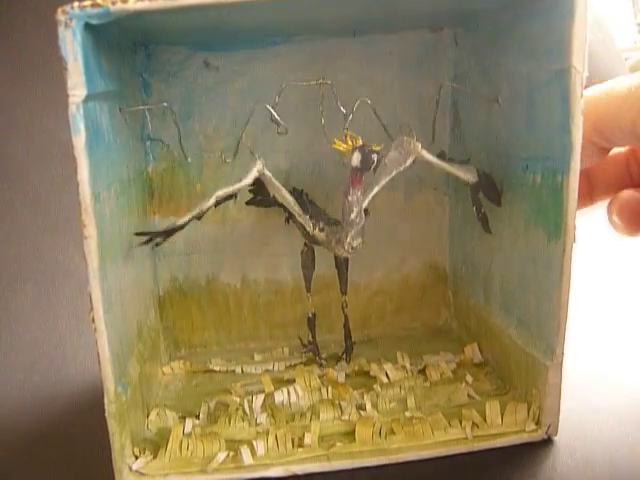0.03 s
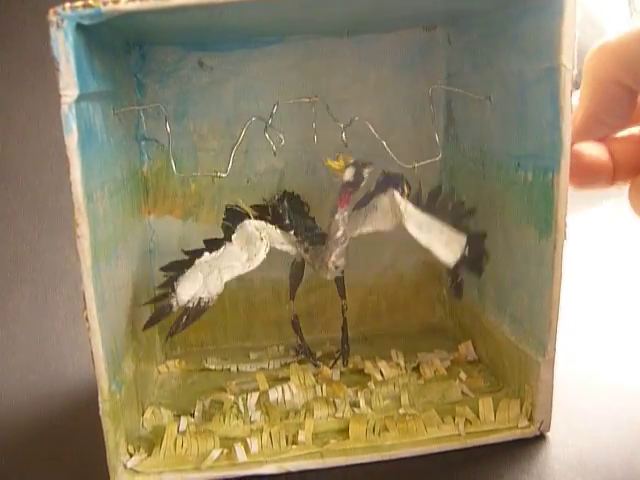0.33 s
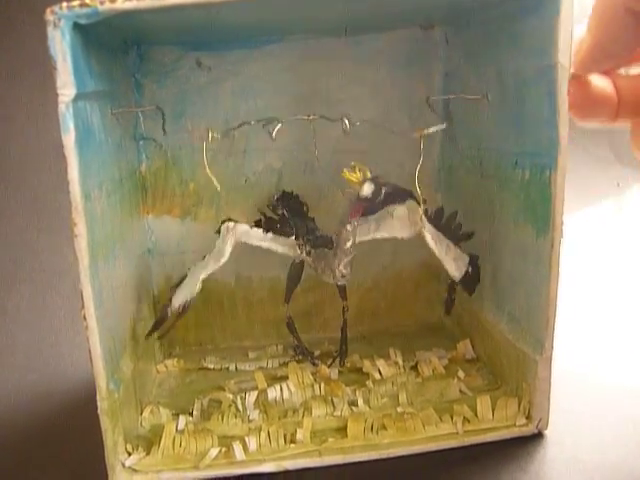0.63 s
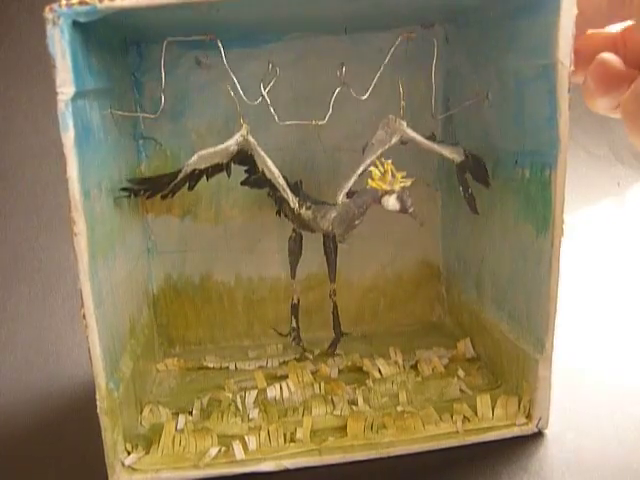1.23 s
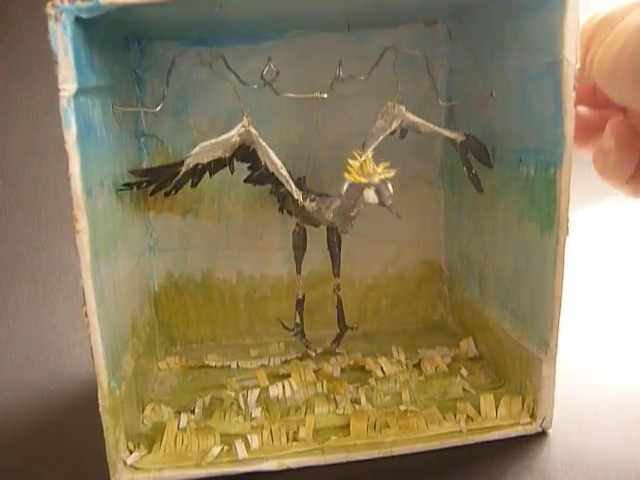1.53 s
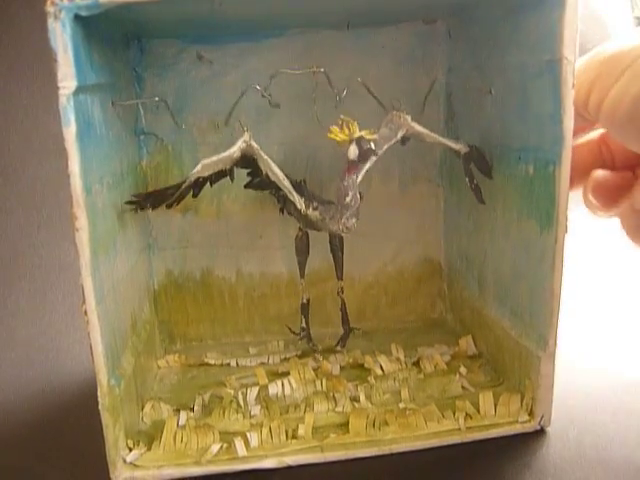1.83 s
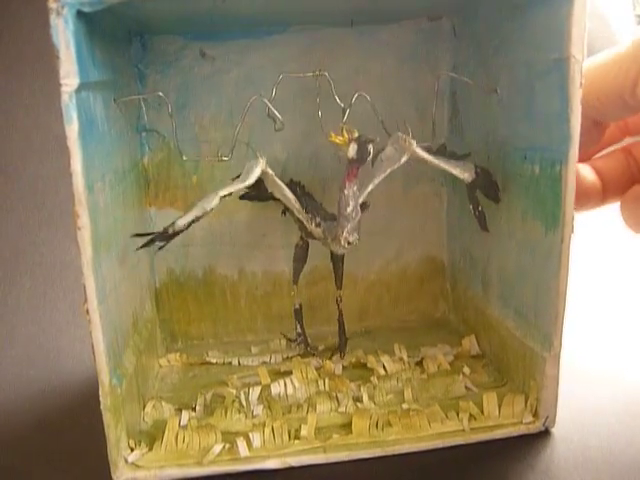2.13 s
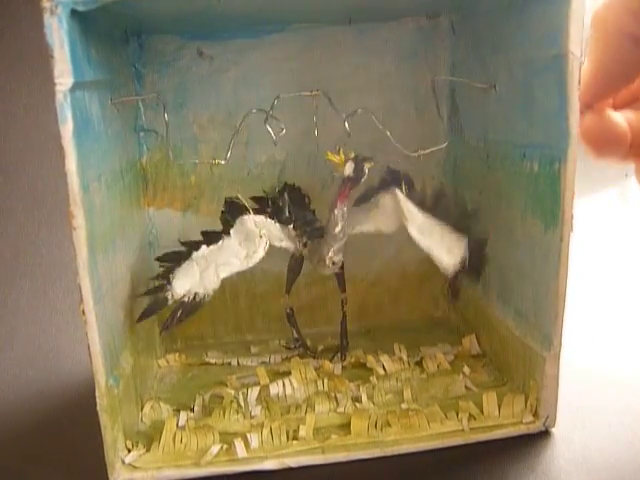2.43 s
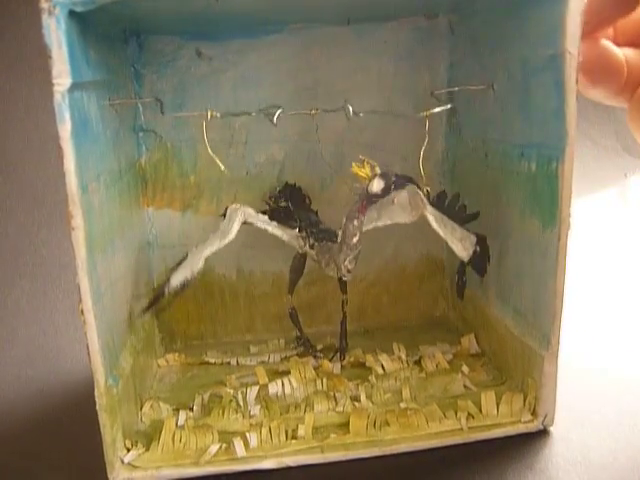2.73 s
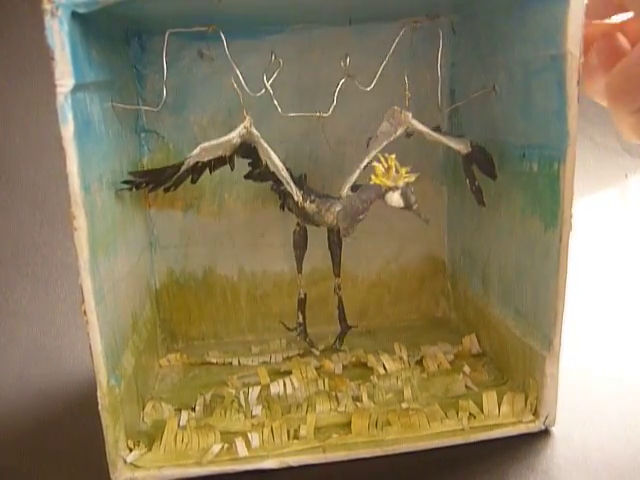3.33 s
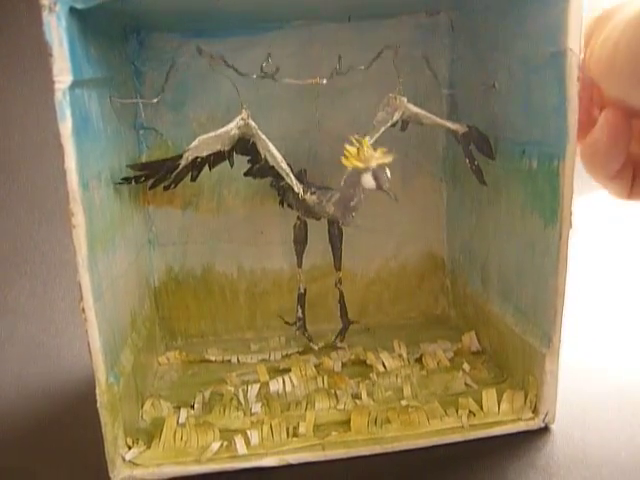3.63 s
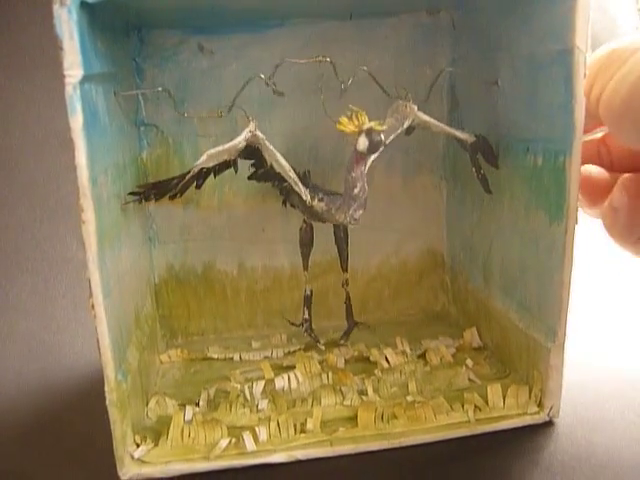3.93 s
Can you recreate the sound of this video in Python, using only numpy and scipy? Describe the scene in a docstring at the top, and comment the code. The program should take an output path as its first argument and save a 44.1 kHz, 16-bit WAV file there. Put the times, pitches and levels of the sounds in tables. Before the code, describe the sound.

A small wire and cardboard toy clicks, rubs and snaps as it is cranked by hand.

```python
"""A link snaps down over the wire crank of a hand-turned paper bird, once in each of two turns.
Each impact excites the damped modes of the toy's small cardboard box. In between, stick-slip friction
makes the wire rub, catch and knock in its cardboard bearings, and the wings rustle. The quiet room adds
a short reverberation and soft noise, with a faint electrical whine and faint dry electrical ticks."""
import sys
import numpy as np
from scipy import signal
from scipy.fft import rfft, irfft
from scipy.io import wavfile
from scipy.ndimage import uniform_filter1d

SR = 44100
rng = np.random.default_rng(int(sys.argv[2]) if len(sys.argv) > 2 else 0)


def output_pcm(signal):
    """Save a mono or channel-first signal as 16-bit PCM at the path in sys.argv[1].

    Samples are clipped to [-1, 1] before scaling.
    """
    pcm = np.clip(np.atleast_2d(signal).T, -1, 1) * 32767
    wavfile.write(sys.argv[1], SR, np.round(pcm).astype(np.int16))


N = 176400
T = np.arange(SR // 4) / SR  # time axis of one impact, t/s

# Levels in spectra and modes are relative.
# room noise spectrum: f/Hz, level/dB
AIR_SPECTRUM = [(20, -17), (45, -11.5), (90, -9), (150, -0.5), (200, 0.5), (245, 4), (300, 0), (400, 1),
                (520, -2.5), (700, -1.5), (870, -5), (1100, 0.5), (1400, -7.5), (1800, -11), (2700, -11.5),
                (3600, -15.5), (5000, -22), (6500, -23.5), (8000, -26.5)]
# electrical tones: f/Hz, level/dB
WHINE_TONES = [(1384, -62), (1631, -67.5), (5398, -76.5), (6222.5, -80), (6666.5, -77.5)]
# faint dry electrical ticks: t/s, relative level/dB
TICKS = [(.1375, -40), (.144, -41), (.277, -39), (.647, -40), (1.017, -44), (1.030, -38), (1.510, -40),
         (1.539, -38), (1.5585, -39), (1.7425, -39), (2.116, -39), (2.200, -41), (2.356, -38),
         (2.5465, -40), (2.8865, -40), (2.9155, -36.5), (3.120, -42), (3.142, -38), (3.535, -43)]
# tick spectrum: f/Hz, level/dB
TICK_SPECTRUM = [(300, -9), (2000, -4), (5000, -3), (8000, -1.5)]
# reverberation time: f/Hz, t60/s
ROOM_T60 = [(200, 0.3), (700, 0.17), (1600, 0.29), (4000, 0.18), (8000, 0.35)]
# initial spectrum of the reverberation: f/Hz, level/dB
ROOM_SPECTRUM = [(200, -12.5), (480, -4.5), (660, -12.5), (1000, -0.5), (1500, 1), (3000, -1), (8000, -4)]
# wing beats: centre t/s, 1/e half-width/s, level/dB
RUSTLES = [(.51, 0.035, -51), (0.648, 0.034, -49), (2.455, 0.073, -51), (3.795, 0.11, -53)]
# paper spectrum: f/Hz, level/dB
PAPER_SPECTRUM = [(700, -13), (1500, 5), (1850, 2.5), (2050, 9.5), (2200, -28), (2500, 4), (3000, -7.5),
                  (4200, -12), (8000, -35.5)]
# bearing friction envelope: t/s, level/dB
RUB_ENVELOPE = [(0, -44), (.2, -42), (.45, -41), (.52, -38.5), (.73, -47.5), (.9, -44), (1.1, -44),
                (1.3, -49.5), (1.55, -58), (1.75, -45), (1.87, -49), (2.1, -47.5), (2.2, -43.5),
                (2.39, -43), (2.52, -39), (2.61, -46.5), (2.8, -47.5), (3.05, -45.5), (3.3, -46.5),
                (3.6, -56), (3.8, -40), (4, -63)]
# bearing friction spectrum: f/Hz, level/dB
RUB_SPECTRUM = [(80, -26.5), (180, -27), (245, -4.5), (330, -18), (420, -11.5), (520, 4.5), (590, -6.5),
                (680, 5.5), (800, -6), (950, -13), (1100, -15), (1650, -20), (2050, -17.5), (3000, -31.5),
                (4300, -32), (8000, -46.5)]
# wire scrapes on wire: t/s, level/dB
SCRAPES = [(0.639, -40.5), (0.886, -44.5), (.899, -44.5), (2.677, -37), (2.946, -41)]
# scrape spectrum: f/Hz, level/dB
WIRE_SPECTRUM = [(500, -27), (3200, -24), (4300, 3.5), (5400, -5), (6700, -2), (8000, -14.5)]
# the wire catches and slips: t/s, level/dB, panel f/Hz, t60/s, scratch level re ring/dB
KNOCKS = [(.037, -33.5, 524, 0.094, -24), (.095, -25.5, 559, 0.089, -19), (.126, -27, 517, 0.16, -41),
          (.176, -36, 660, .05, -17), (.198, -27, 554, 0.045, -30), (.3055, -21, 672, 0.038, -20),
          (.3478, -23, 590, 0.037, -24), (.379, -28, 770, 0.034, -18), (.4225, -31, 710, 0.025, -22),
          (.500, -36, 580, 0.035, -12), (.645, -28.5, 710, .05, -29), (.803, -36, 505, 0.15, -29),
          (.883, -28.5, 820, 0.044, -6), (.898, -30, 770, 0.055, -4), (2.219, -28, 790, .03, -25),
          (2.230, -23, 667, 0.026, -23), (2.295, -29.5, 640, 0.049, -10.5), (2.358, -25.5, 694, 0.023, -18),
          (2.449, -27.5, 654, 0.064, -15), (2.473, -31.5, 675, 0.14, -20), (2.507, -24, 640, 0.045, -25),
          (2.518, -31, 520, 0.029, -26), (2.529, -19.5, 565, 0.023, -22), (2.742, -30.5, 660, 0.067, -27),
          (2.838, -20.5, 605, 0.01, -29), (2.9255, -25.5, 700, 0.036, -10.5),
          (3.1318, -27, 566, 0.035, -24), (3.177, -33, 700, .02, -6), (3.293, -28, 493, .04, -24),
          (3.3244, -18, 600, 0.044, -10), (3.3315, -21.5, 637, 0.018, -30), (3.490, -30.5, 628, 0.026, -15),
          (3.775, -24, 530, 0.034, -14.5), (3.854, -26, 590, 0.027, -23)]
# scratch spectrum: f/Hz, level/dB
SCRATCH_SPECTRUM = [(300, -18), (900, -0.5), (1300, -2), (2000, -1), (2900, -0.5), (3700, -2), (4500, -15),
                    (8000, -39)]
# the crank shifts in its bearing: t/s, gain/dB
BUMPS = [(1.7543, -5.5), (1.786, -22), (3.8178, -9)]
# modes of a bump: f/Hz, level/dB, t60/s
BUMP_MODES = [(257, -20.5, 0.1), (533, -9.5, 0.027), (610, -14, 0.021), (760, -6.5, 0.011)]
# the link drops: t/s, ring gain/dB
SNAPS = [(0.9345, -6), (2.9623, -5)]
# modes of box and wire: f/Hz, level/dB, t60/s
BOX_MODES = [(250, -32.5, 0.26), (493, -34, 0.23), (667, 0, 0.059), (717, -13, 0.12), (820, -20.5, 0.089),
             (1443, -23.5, 0.068), (1478, -23.5, 0.086), (1514, -5.5, 0.0085), (1556, -26.5, 0.07),
             (1788, -26, 0.088), (2070, -15.5, 0.012), (2446, -35.5, 0.058), (2635, -31, 0.083),
             (3100, -14.5, 0.0096), (3610, -21, 0.022), (4890, -31, 0.02)]
# spectrum of the link's landing: f/Hz, level/dB
CRACK_SPECTRUM = [(200, -23), (600, -2), (1000, 8.5), (1600, -3.5), (2400, 9), (3600, -4), (4500, -21),
                  (6800, -20.5), (8500, -25)]
# spectrum of its rebound: f/Hz, level/dB
BOUNCE_SPECTRUM = [(300, -28), (700, -24), (1100, -9), (1500, 3.5), (2600, -23), (4000, -23), (8000, -46)]


def amp(db):
    """Amplitude ratio of a level in decibels."""
    return 10 ** (np.asarray(db) / 20)


def unit(x):
    """Normalisation to unit RMS."""
    return x / np.sqrt(np.mean(x ** 2) + 1e-20)


def curve_at(points, hz):
    """Interpolation on a logarithmic frequency axis."""
    f, value = np.transpose(points)
    return np.interp(np.log(hz + 1), np.log(f + 1), value)


def add(mix, s, sound):
    """Superposition of a sound starting at s seconds."""
    part = mix[max(round(s * SR), 0):][:len(sound)]
    part += sound[:len(part)]


def filtered(x, spectrum):
    """Zero-phase filtering: spectra multiply."""
    hz = np.fft.rfftfreq(len(x), 1 / SR)
    return irfft(rfft(x) * amp(curve_at(spectrum, hz)), len(x))


def colour(x, spectrum):
    """Spectral shaping at unit RMS."""
    return unit(filtered(x, spectrum))


def decay(t, t60):
    """Exponential damping: 60 dB in t60 seconds."""
    return np.exp(-np.log(1000) * t / t60)


def rise(tau_s):
    """First-order build-up."""
    return 1 - np.exp(-T / tau_s)


def ring(modes, build_cycles=1.61):
    """Modal superposition: each mode builds up and decays at its own rate."""
    return sum(amp(db) * rise(build_cycles / hz) * decay(T, t60) * np.sin(2 * np.pi * hz * T)
               for hz, db, t60 in modes)


def burst(spectrum, t60):
    """Modal overlap: close, heavily damped modes merge into a dying noise."""
    return colour(rng.standard_normal(len(T)), spectrum) * decay(T, t60)


def slips(per_s=1800, spread_db=2.5):
    """Stick-slip motion as a Poisson train of impulses."""
    occurs = rng.random(N) < per_s / SR
    sign = rng.choice([-1, 1], N)
    return occurs * sign * amp(spread_db * np.minimum(rng.exponential(1, N), 3))


def room_noise(level_db=-45.5, patch_db=1.9):
    """Random modulation: soft noise varies in patches of time and frequency."""
    bands = signal.stft(rng.standard_normal(N), nperseg=1024)[2]
    patches = uniform_filter1d(rng.standard_normal(bands.shape), size=10, axis=0)
    patches = unit(uniform_filter1d(patches, size=8, axis=1))
    noise = signal.istft(bands * amp(patch_db * patches), nperseg=1024)[1][:N]
    return amp(level_db) * colour(noise, AIR_SPECTRUM)


def whine():
    """A line spectrum: steady electrical tones in random phase."""
    t = np.arange(N) / SR
    return sum(amp(db) * unit(np.sin(2 * np.pi * (hz * t + rng.random()))) for hz, db in WHINE_TONES)


def faint_ticks(gain_db=13):
    """Filtered impulses: tiny broadband clicks with no ring."""
    out = np.zeros(N)
    for s, db in TICKS:
        add(out, s, amp([db + gain_db]))
    return filtered(out, TICK_SPECTRUM)


def reverberation(x, gain_db=-15, delay_s=.012):
    """Convolution with a diffuse tail, each band decaying at its own rate."""
    noise = colour(rng.standard_normal(SR // 2), ROOM_SPECTRUM)
    hz, t, bands = signal.stft(noise, SR, nperseg=256)
    tail = signal.istft(bands * decay(t, curve_at(ROOM_T60, hz)[:, None]), SR, nperseg=256)[1]
    out = np.zeros(N)
    add(out, delay_s, signal.fftconvolve(x, tail / np.linalg.norm(tail)))
    return amp(gain_db) * out


def wing_rustle():
    """Amplitude modulation: paper noise swells as the wings beat."""
    swells = sum(amp(db) * np.exp(-((np.arange(N) / SR - s) / width) ** 2) for s, width, db in RUSTLES)
    return colour(slips(), PAPER_SPECTRUM) * swells


def bearing_rub():
    """Stick-slip friction of the wire turning in cardboard."""
    level_db = np.interp(np.arange(N) / SR, *np.transpose(RUB_ENVELOPE))
    return colour(slips(), RUB_SPECTRUM) * amp(level_db)


def wire_scrapes():
    """Sliding friction of wire on wire gives short bright bursts."""
    out = np.zeros(N)
    for s, db in SCRAPES:
        add(out, s, amp(db) * rise(tau_s=.00067) * burst(WIRE_SPECTRUM, t60=.023))
    return out


def panel_knocks(lower_ratio=.8, lower_db=-19.5):
    """Free vibration: each slip of the wire scratches and sets two panel modes ringing."""
    out = np.zeros(N)
    for s, db, hz, t60, scratch_db in KNOCKS:
        phase = 2 * np.pi * hz * T
        panel = decay(T, t60) * (np.sin(phase) + amp(lower_db) * np.sin(lower_ratio * phase))
        scratch = amp(scratch_db) * burst(SCRATCH_SPECTRUM, t60=.027)
        add(out, s, amp(db) * rise(tau_s=.0016) * (panel + scratch))
    return out


def crank_bumps():
    """Low damped modes sound a dull bump as the crank shifts."""
    out = np.zeros(N)
    for s, db in BUMPS:
        add(out, s, amp(db) * ring(BUMP_MODES))
    return out


def link_snaps(contact_db=-32.5, contact_t60=.046, bounce_s=.0152):
    """Impact excitation: the link lands with a crack, rings the box and rebounds once."""
    out = np.zeros(N)
    for s, db in SNAPS:
        add(out, s, amp(db) * ring(BOX_MODES))
        add(out, s, amp(contact_db) * burst(CRACK_SPECTRUM, contact_t60))
        add(out, s + bounce_s, amp(contact_db) * burst(BOUNCE_SPECTRUM, contact_t60))
    return out


def scene():
    """Superposition of toy, reverberation and background; the ticks stay dry."""
    toy = link_snaps() + crank_bumps() + panel_knocks() + wire_scrapes() + bearing_rub() + wing_rustle()
    return (toy + reverberation(toy) + faint_ticks() + room_noise() + whine())[None]


def record(dry, cutoff_hz=8040, offset=-.0695):
    """Band limiting by a low-pass filter, plus a constant offset."""
    lowpass = signal.firwin(201, cutoff_hz, window=("kaiser", 8), fs=SR)
    return signal.oaconvolve(dry, lowpass[None], "same") + offset


dry = scene()
out = record(dry)
output_pcm(out)
```